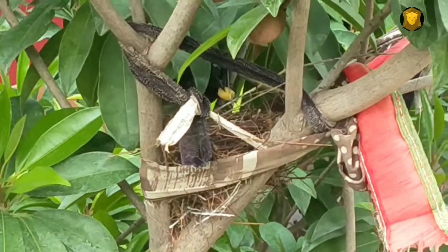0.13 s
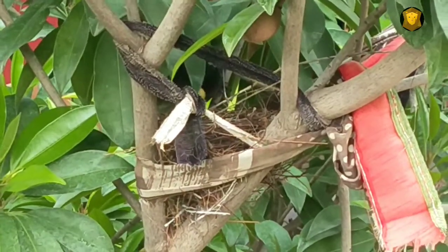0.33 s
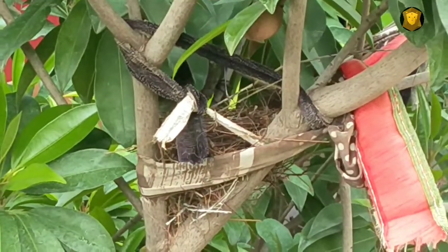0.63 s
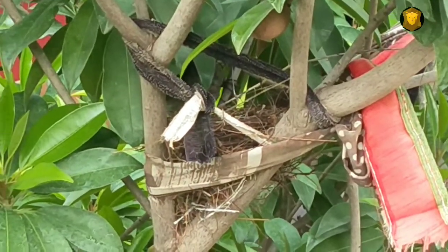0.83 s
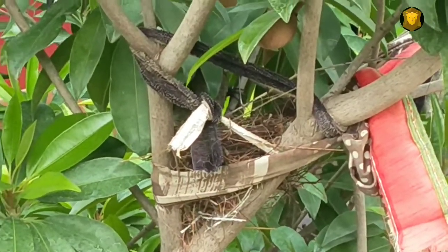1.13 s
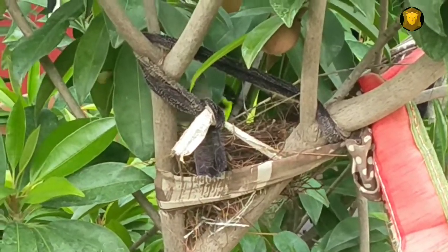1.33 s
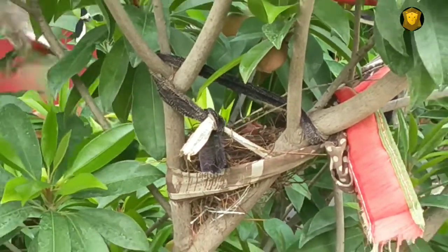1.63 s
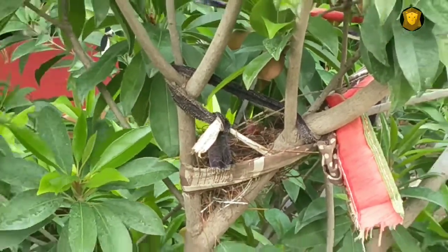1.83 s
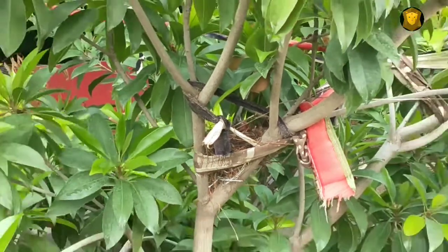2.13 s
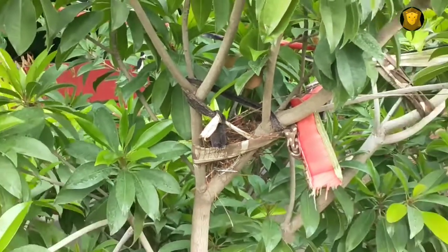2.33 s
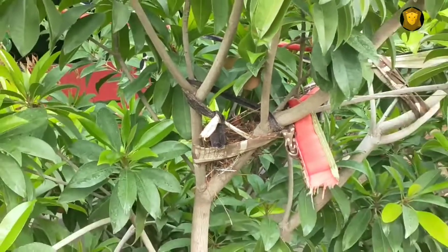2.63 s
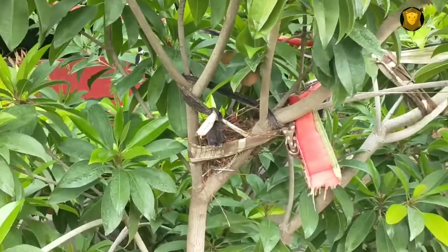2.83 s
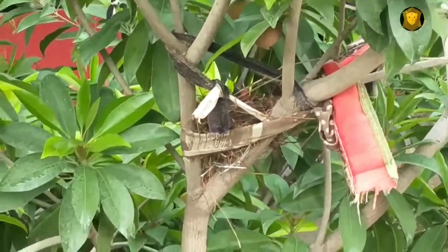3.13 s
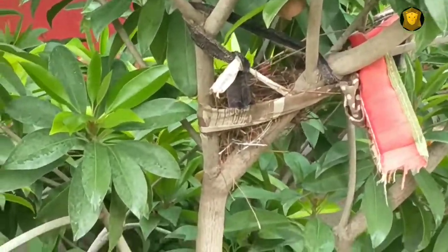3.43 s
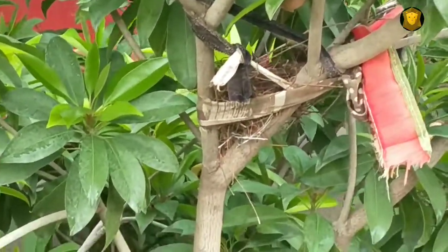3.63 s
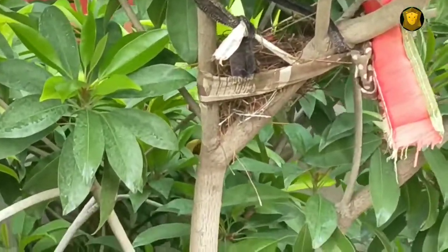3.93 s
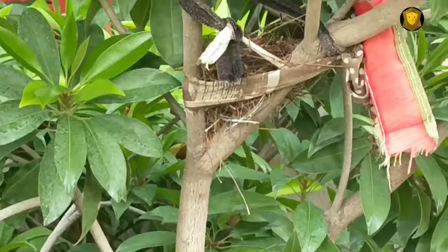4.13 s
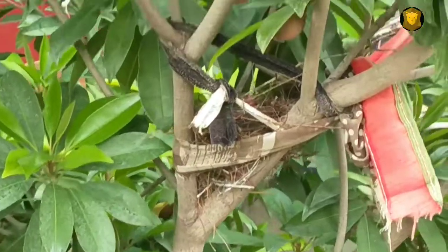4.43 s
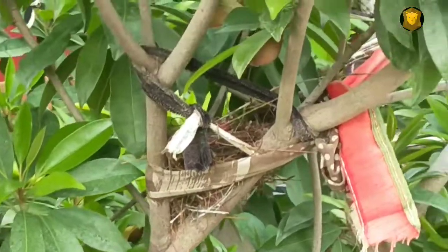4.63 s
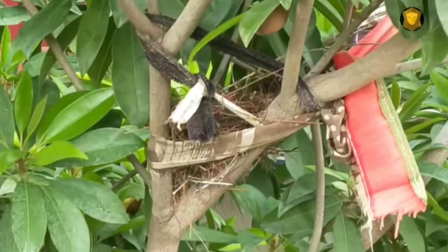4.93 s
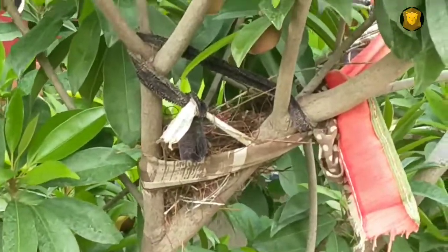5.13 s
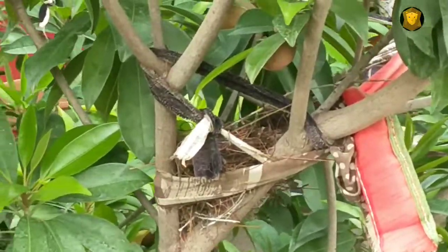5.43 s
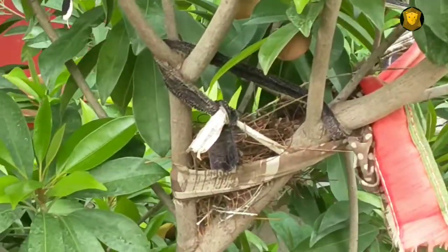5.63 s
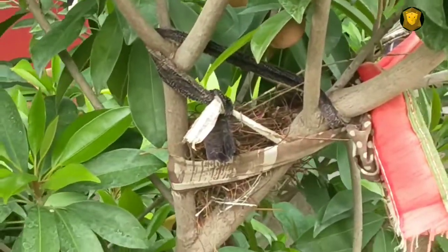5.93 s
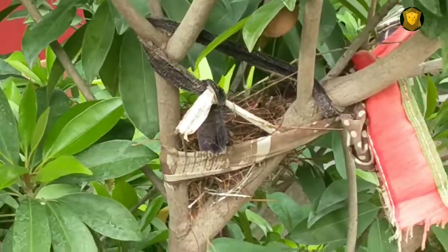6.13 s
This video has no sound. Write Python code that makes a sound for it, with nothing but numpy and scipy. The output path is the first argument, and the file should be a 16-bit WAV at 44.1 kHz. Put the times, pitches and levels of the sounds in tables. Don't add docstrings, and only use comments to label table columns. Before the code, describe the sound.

Several birds call close together among leaves, with a short scattered outdoor echo. Steady, mid-high double chirps lead and fade away before five seconds; a slow rattling croak opens underneath. Sharp upward flicks follow, then a loud run of rasping chatter near four seconds. After a brief lull, two harsh syllables, woody knocks and more flicks return. Wind puffs bump each side of the exposed microphone separately, over soft rustling.

```python
import sys
import numpy as np
from scipy import signal
from scipy.fft import rfft, irfft, next_fast_len
from scipy.io import wavfile
from scipy.ndimage import uniform_filter1d, map_coordinates

SR = 44100
rng = np.random.default_rng(int(sys.argv[2]) if len(sys.argv) > 2 else 0)


def digitize_waveform(pressure):
    field = np.atleast_2d(pressure).T
    bounded = np.clip(field, -1, 1)
    quanta = np.round(bounded * 32767).astype(np.int16)
    wavfile.write(sys.argv[1], SR, quanta)


def volts(x):
    e = np.asarray(x, float) / 20
    return 10 ** e


N = 276948


def unit(x):
    return x / np.sqrt(np.mean(x ** 2) + 1e-20)


def along(points, hz):
    f, v = np.transpose(points)
    return np.interp(np.log(hz + 1), np.log(f + 1), v)


def curves(rows):
    s, *cols = np.transpose(rows)
    return [np.interp(np.arange(N) / SR, s, c) for c in cols]


def wobble(rate, size=N):
    knots = rng.standard_normal(int(size * rate / SR) + 4)
    return map_coordinates(knots, [np.arange(size) * rate / SR])


def filtered(x, response):
    m = next_fast_len(x.shape[-1] + 8192)
    spectrum = rfft(x, m) * response(np.fft.rfftfreq(m, 1 / SR))
    return irfft(spectrum, m)[..., :x.shape[-1]]


def rush(spectrum, alike, patchy_db):
    z = signal.stft(rng.standard_normal((2, N)), nperseg=512)[2]
    field = uniform_filter1d(rng.standard_normal(z.shape[1:]), size=3, axis=0)
    field = uniform_filter1d(field, size=22, axis=1)
    pair = signal.istft(z * volts(patchy_db * unit(field)), nperseg=512)[1][:, :N]
    a, b = filtered(pair, lambda hz: volts(along(spectrum, hz)))
    turn = np.arccos(np.clip(alike, 0, 1)) / 2
    shared, apart = np.cos(turn) * a, np.sin(turn) * b
    return unit(np.array([shared + apart, shared - apart]))


def add(stage, sound, s, pan_db, lag):
    starts = (round(s * SR + lag), round(s * SR))
    for port, gain, start in zip(stage, volts([pan_db / 2, -pan_db / 2]), starts):
        port[start:start + len(sound)] += gain * sound[:len(port) - start]


def sing(shape, hz, overtones_db, flutter_db, flutter_hz=130, effort=0.2):
    s, ratio, db = np.transpose(shape)
    t = np.arange(s[0], s[-1], 1 / SR)
    phase = 2 * np.pi * np.cumsum(hz * np.interp(t, s, ratio)) / SR
    swell_db = np.interp(t, s, db)
    voice = np.zeros(len(t))
    for k, level in enumerate(overtones_db):
        flutter = flutter_db * (1 + k) * wobble(flutter_hz, size=len(t))
        voice += volts(level + (1 + effort * k) * swell_db + flutter) * np.sin((k + 1) * phase)
    return np.sqrt(2) * voice


def glide(length, start_hz, end_hz, fade_db, overtones_db):
    end = end_hz / start_hz
    shape = [(-.006, 1.03, -16), (0, 1, -1),
             (min(.3 * length, .013), .85 + .15 * end, 0),
             (.65 * length, .28 + .72 * end, fade_db / 2),
             (max(length - .004, .7 * length), end, fade_db),
             (length + .004, end, -28)]
    return sing(shape, start_hz, overtones_db, flutter_db=1.3, flutter_hz=260, effort=.8)


# start in seconds, wait to the second note in seconds,
# length of the second note in seconds, pitch in Hz, level in dB.
CALLS = [(-.078, .082, 0.028, 2296, -56), (0.214, 0.087, 0.047, 2365, -52),
         (0.514, 0.08, 0.048, 2367, -48.5), (.812, 0.084, 0.034, 2343, -50),
         (1.112, 0.082, 0.054, 2368, -55), (1.419, 0.078, .048, 2354, -53.5),
         (1.724, 0.075, 0.05, 2332, -54.5), (2.027, 0.076, 0.041, 2342, -52.5),
         (2.335, 0.077, 0.061, 2345, -55.5), (2.648, .08, 0.086, 2250, -61),
         (2.975, .073, 0.079, 2196, -60.5), (3.303, 0.07, 0.052, 2200, -59),
         (3.631, 0.058, .06, 2243, -63.5), (3.992, 0.078, 0.032, 2140, -63.5),
         (4.335, .076, 0.077, 2170, -64), (4.736, .073, .073, 2140, -62)]
# time in seconds, left over right in dB.
CALLER_PAN = [(0, 4.5), (2.1, 3.5), (2.9, 0), (3.8, 6.5), (5, -2)]
# time in seconds, level in dB.
CALLER_OVERTONE = [(0, -11), (.2, -21), (.6, -17.5), (1.3, -18), (1.75, -20), (2, -28), (5, -28)]


def caller():
    pause_s, lift, second_note_db = 0.038, 1.02, 0.8
    first_sag, second_sag, lowest_hz = 3300, 9300, 1710
    fuzz_depth, fuzz_hz = .13, 1200
    grace_shape = [(0, .88, -14), (.016, 1.04, -5), (.023, 1.15, 0), (.029, 1.06, -8)]
    catch_shape = [(0, 1.05, -10), (.006, 1.17, 0), (.014, 1.05, -8)]
    stage = np.zeros((2, N))
    for s, wait, length, hz, db in CALLS:
        pan_db = np.interp(s, *np.transpose(CALLER_PAN))
        overtone_db = np.interp(s, *np.transpose(CALLER_OVERTONE))
        if s > 0:
            grace = sing(grace_shape, hz, [0, -24], flutter_db=3, flutter_hz=800)
            add(stage, volts(db - 7) * grace, s - .029, pan_db, lag=13.6)
            first_s = wait - pause_s
            first = glide(first_s, .985 * hz, hz - first_sag * first_s, -6.5, [0, overtone_db])
            add(stage, volts(db - 1.5) * first, s - .004, pan_db, lag=19)
        top_hz = lift * hz
        end_hz = max(top_hz - second_sag * length, lowest_hz)
        second = glide(length, .985 * top_hz, end_hz, -10, [0, overtone_db - 3])
        catch = sing(catch_shape, hz, [0], flutter_db=2.5, flutter_hz=900)
        add(stage, volts(db - 11) * catch, max(s + wait - .006, 0), pan_db, lag=14)
        add(stage, volts(db - 1.5 + second_note_db) * second, s + wait, pan_db, lag=19)
    return stage * (1 + fuzz_depth * wobble(fuzz_hz))


# time in seconds, arch top in Hz, arch level in dB,
# wait to the flick in seconds, flick level in dB.
PHRASES = [
    (1.8, 3510, -62, .12, -49),
    (2.14, 3485, -55.5, .12, -49),
    (2.465, 3486, -58, 0.13, -48.5),
    (2.805, 3560, -60.5, 0.12, -51.5),
    (5.283, 3450, -59, .129, -50),
    (5.631, 3435, -61, .13, -53.5),
    (5.981, 3440, -66, 0.12, -56.5),
]
# time in seconds, pitch ratio, level in dB.
ARCH_SHAPE = [(-.036, .62, -22), (-.018, .79, -7), (-.007, .95, -2), (0, 1, 0), (.007, .95, -2),
              (.018, .81, -5), (.036, .74, -18)]
FLICK_SHAPE = [(-.04, .7, -32), (-.026, .715, -16), (-.016, .77, -3), (-.006, .93, 0), (-.001, 1, -3),
               (.003, .97, -9), (.008, .92, -24)]
# start in seconds, length in seconds, start pitch in Hz, end pitch in Hz, level in dB.
WHISTLES_LEFT = [(1.345, 0.11, 4050, 4380, -76), (1.409, 0.031, 5580, 4960, -72),
                 (1.705, 0.018, 5520, 5150, -74), (4.071, 0.079, 2307, 2365, -64.5),
                 (4.115, 0.008, 5930, 5540, -57), (4.198, 0.055, 2296, 2400, -72.5),
                 (4.386, .041, 2330, 2495, -70.5), (4.419, 0.048, 2470, 2468, -68.5),
                 (6.047, .09, 2650, 2550, -77.5)]
WHISTLES_RIGHT = [(.165, .03, 4880, 5230, -72), (.197, .04, 5250, 4980, -69), (.195, .03, 6650, 6550, -74),
                  (.455, .04, 6050, 6000, -80), (4.083, 0.032, 5330, 5970, -57),
                  (5.176, 0.017, 1480, 1600, -66.5), (5.668, 0.073, 2590, 2480, -75.5),
                  (5.688, .06, 1880, 1776, -73.5), (5.728, 0.025, 2440, 2240, -70)]


def singers():
    stage = np.zeros((2, N))
    for s, hz, db, wait, flick_db in PHRASES:
        arch = sing(ARCH_SHAPE, hz, [0], flutter_db=2.2, flutter_hz=320)
        add(stage, volts(db) * arch, s + ARCH_SHAPE[0][0], -2, lag=14)
        flick = sing(FLICK_SHAPE, 5248, [0], flutter_db=2.2, flutter_hz=320)
        add(stage, volts(flick_db) * flick, s + wait + FLICK_SHAPE[0][0], 5, lag=14)
    for rows, pan_db in ((WHISTLES_LEFT, 13), (WHISTLES_RIGHT, -6)):
        for s, length, start_hz, end_hz, db in rows:
            whistle = glide(length, start_hz, end_hz, -2, [0])
            add(stage, volts(db) * whistle, s, pan_db, lag=3)
    return stage


# time in seconds, peak level in dB, effort from 0 to 1.
CHATTER = [(1.962, -47.5, .7), (2.049, -42.5, 0.89), (3.651, -42.5, .3), (3.703, -40.5, 0.71),
           (3.769, -38, 0.88), (3.85, -38, 0.87), (3.955, -36.5, 0.91), (4.044, -35, 1), (4.134, -36, 0.97),
           (5.132, -47.5, 0.34), (5.191, -43.5, 0.27), (5.254, -40, 0.88), (5.36, -39.5, 0.82)]
# time in seconds, pitch ratio, level in dB.
SYLLABLE = [(-.007, .82, -16), (0, .88, -4), (.008, 1.02, 0), (.014, 1.2, -5), (.021, 1.15, -8),
            (.032, .97, -22)]
CHATTER_HARMONICS = [0, -.5, -1.5, -9, -9, -15]
# frequency in Hz, level in dB.
THROAT = [(550, -54), (800, -7.5), (1050, -5), (1500, -6.5), (2000, -7), (3200, -1.5), (4100, -2.5),
          (5300, -6), (7000, -11)]


def chatter():
    breath_at_s, breath_s, grain_db = .026, .013, 2.8
    weak_tilt_db = 4
    stage = np.zeros((2, N))
    for s, db, effort in CHATTER:
        shape = [(t, 1 + effort * (ratio - 1), swell_db) for t, ratio, swell_db in SYLLABLE]
        tilt_db = weak_tilt_db * (1 - effort) * np.arange(len(CHATTER_HARMONICS))
        stack = sing(shape, 1000, CHATTER_HARMONICS - tilt_db, flutter_db=1.6, flutter_hz=400, effort=.2)
        t = np.arange(len(stack)) / SR
        breath = np.exp(-((t - breath_at_s) / breath_s) ** 2) * rng.standard_normal(len(t))
        breath = breath * volts(grain_db * wobble(350, size=len(t)))
        broken = volts(3 * (1.1 - effort) * wobble(220, size=len(t)))
        syllable = broken * (stack + (1.3 + 1.9 * effort) * breath)
        add(stage, volts(db - 13.5) * syllable, s + SYLLABLE[0][0], -.4, lag=2)
    return filtered(stage, lambda hz: volts(along(THROAT, hz)))


# time in seconds, pulses a second, level in dB.
CROAKS = [
    [(0, 101, -53), (.15, 95, -47.5), (.33, 86, -45), (.4, 68, -46.5), (.49, 70, -46.5), (.51, 49, -102)],
    [(5.98, 66, -56), (6.05, 70, -57.5), (6.15, 72, -46.5), (6.25, 130, -63), (6.28, 51, -74)],
]
# center in Hz, width in Hz, level in dB.
CROAK_THROATS = [
    [(1240, 810, -7), (1780, 106, 9), (2100, 440, 1)],
    [(1080, 620, -8.5), (1760, 55, 13), (2740, 400, 1)],
]


def croaks():
    voice = np.zeros(N)
    for rows, modes in zip(CROAKS, CROAK_THROATS):
        rate, db = curves(rows)
        cycles = np.cumsum(rate * (1 + .04 * wobble(40))) / SR
        at = np.flatnonzero(np.diff(np.floor(cycles)))
        at = at[(at >= rows[0][0] * SR) & (at < rows[-1][0] * SR)]
        pulses = np.zeros(N)
        pulses[at] = volts(db[at] + 28 + 2.5 * wobble(90)[at])

        def throat(f):
            ring = 0
            for k, (center, width, gain_db) in enumerate(modes):
                band = 1j * f * width / (center * center - f * f + 1j * f * width)
                ring = ring + (-1) ** k * volts(gain_db) * band
            surface = 1 + 0.57 * np.exp(-2j * np.pi * f * 0.00417)
            return ring / (1 + (f / 2700) ** 8) * surface

        voice = voice + filtered(pulses, throat)
    return np.array([voice * volts(-5.0), np.roll(voice, -8) * volts(-8.0)])


# time in seconds, peak level in dB, center in Hz, fall by 60 dB in seconds.
TICKS = [
    (1.247, -50.5, 4520, 0.023),
    (1.453, -53, 5480, 0.0055),
    (1.514, -54.5, 4450, 0.036),
    (3.749, -47, 5000, 0.00604),
    (4.305, -46, 6000, .006),
    (5.41, -52, 2600, .008),
    (5.444, -41, 2710, 0.014),
    (5.509, -36, 2654, 0.012),
    (5.553, -50.5, 5170, 0.0068),
    (5.598, -56.5, 5480, 0.069),
]
SCRATCHES = [
    (4.5037, -61, 5380, 0.04),
    (4.6049, -58, 5040, 0.04),
    (4.6349, -60, 4920, 0.04),
    (4.7094, -62, 5310, 0.04),
    (4.8928, -69, 6230, 0.04),
    (4.9187, -66, 6390, 0.04),
]


def twigs():
    stage, t = np.zeros((2, N)), np.arange(1500) / SR
    for s, db, hz, t60 in TICKS + SCRATCHES:
        grit = uniform_filter1d(rng.standard_normal(len(t)), size=20) * np.sqrt(20)
        scratch = 25 * t60 * grit * volts(-60 * t / t60) * (t > .001)
        ring = volts(-60 * t / 0.0072) + scratch
        onset = 1 - np.exp(-t / 0.00029)
        add(stage, volts(db + 2.5) * np.sin(2 * np.pi * hz * t) * ring * onset, s, -1.5, lag=1.8)
    return stage


# frequency in Hz, level in dB per Hz.
WIND_TONE = [(12, -45), (20, -20), (59, 1.5), (108, 2.5), (189, -8), (375, -28), (604, -40), (687, -32),
             (900, -50), (1170, -55.5), (1980, -120)]
# time in seconds, level in dB, length in seconds.
EDDIES_LEFT = [(0.078, -32.5, 0.036), (0.236, -39, 0.051), (0.485, -37, 0.089), (0.569, -35, 0.057),
               (0.74, -41.5, 0.04), (0.867, -39.5, 0.037), (1.176, -41, 0.18), (2.071, -47, 0.074),
               (2.189, -42, 0.16), (4.26, -44.5, 0.041), (4.322, -40, 0.021), (4.437, -39, 0.099),
               (4.579, -40.5, 0.015), (4.823, -39, 0.11), (5.179, -41.5, 0.039), (5.242, -39, 0.054),
               (5.664, -42.5, 0.013), (5.819, -46, 0.044), (5.946, -40.5, 0.053), (6.016, -45, 0.086)]
EDDIES_RIGHT = [(0.014, -42.5, 0.16), (0.186, -41.5, 0.025), (0.488, -46.5, 0.062), (0.642, -35.5, 0.038),
                (0.833, -44.5, 0.053), (1.051, -43.5, 0.06), (1.26, -41.5, 0.056), (1.598, -42.5, 0.022),
                (1.658, -35, 0.022), (1.809, -37.5, 0.015), (2.156, -38.5, 0.062), (2.512, -39.5, 0.049),
                (3.229, -37.5, 0.038), (3.352, -42.5, 0.15), (3.526, -39.5, 0.061), (3.64, -42, 0.065),
                (3.747, -37.5, 0.12), (3.959, -32, 0.077), (4.038, -39, 0.035), (4.099, -38, 0.021),
                (5.136, -43, 0.064), (5.759, -43, 0.03), (6.188, -42, 0.022), (6.257, -41, 0.025)]
# time in seconds, level in dB.
LULL_LEFT = [(0, -44), (0.7, -53.5), (2.1, -56.5), (2.8, -63.5), (3.9, -63.5), (4.3, -54.5), (5.2, -53),
             (5.6, -59)]
LULL_RIGHT = [(0, -55), (1.4, -53.5), (2.8, -61), (3.3, -50.5), (4.1, -50), (4.3, -54), (5, -55),
              (5.6, -57)]
# time in seconds, peak pressure (full scale 1), frequency in Hz.
SLAPS = [
    (3.932, .09, 130),
    (3.961, .185, 175),
    (3.9605, .017, 450),
    (3.97, .06, 140),
    (3.979, .06, 140),
    (4.024, .03, 130),
    (4.039, .055, 130),
]


def wind():
    t, stage = np.arange(N) / SR, np.zeros((2, N))
    low = rush(WIND_TONE, 0.2, patchy_db=1.95)
    low = low / np.sqrt(uniform_filter1d(low ** 2, 1500) + .15)
    for port, lull, eddies in ((0, LULL_LEFT, EDDIES_LEFT), (1, LULL_RIGHT, EDDIES_RIGHT)):
        power = volts(1.935 * (curves(lull)[0] + 0.5 + 1.8 * wobble(11)))
        for s, db, length in eddies:
            near = slice(max(round((s - length) * SR), 0), round((s + length) * SR))
            power[near] += volts(2 * db + 5.0) * np.exp(-((t[near] - s) / (0.32 * length)) ** 2)
        stage[port] = np.sqrt(power) * low[port]
    stage = stage + 0.98 * filtered(stage ** 2, lambda hz: hz > 120)
    stage = filtered(stage, lambda hz: 1 / np.sqrt(1 + (42 / (hz + 1)) ** 4))
    for s, peak, hz in SLAPS:
        u = np.pi * hz * (np.arange(800) - 400) / SR
        push = peak * (1 - 2 * u ** 2) * np.exp(-u ** 2)
        stage[1, round(s * SR) - 400:][:800] += push
    return stage


# start in seconds, time to fade 20 dB in seconds, level in dB, left over right in dB.
BRUSHES = [(3.575, .07, -75.5, -12), (3.61, .1, -82, -4), (4.145, .06, -94, -1), (4.29, .12, -90, 0),
           (4.495, .1, -86, 2), (4.56, .15, -89, 0), (4.63, .1, -88, 0), (4.7, .09, -84, -1),
           (4.94, .05, -94, 2), (5.235, .16, -86, -4), (5.33, .16, -84, -6), (5.596, .09, -80, -4),
           (5.815, .05, -91, -4), (6.03, .15, -83, -6), (6.1, .1, -86, -3), (6.15, .15, -80, -2),
           (6.26, .08, -83, -4)]
# time in seconds, level in dB.
FAR_LEVEL = [(0, -74.5), (.48, -70.5), (.62, -77), (2.06, -70.5), (3, -79), (3.35, -75), (3.9, -71),
             (4.9, -77), (5.08, -83), (5.3, -71), (5.86, -73), (6.28, -69.5)]
BREEZE_LEVEL = [(0, -91), (1.3, -91.5), (1.5, -76.5), (3.15, -87.5), (3.3, -77.5), (4.75, -76), (5.05, -90),
                (5.14, -88), (5.4, -79), (6.28, -81)]
# frequency in Hz, level in dB per Hz.
HUM_TONE = [(180, -32), (300, -3), (449, -9), (671, -11.5), (880, -26.5), (1100, -36.5), (1430, -57),
            (2420, -120)]
MURMUR_TONE = [(530, -57), (900, -17.5), (1710, -9), (2230, -5), (2430, -4), (3080, -12.5), (3290, -15),
               (3990, -16), (4200, -28), (5460, -57), (9240, -120)]
LEAF_TONE = [(2240, -63), (3800, -9.5), (4400, -6), (4920, -3.5), (5210, -1), (7540, -17.5), (8460, -23),
             (9410, -23), (11000, -25), (14300, -31.5), (22000, -120)]
BRUSH_TONE = [(4120, -28), (7000, -11), (9000, -14), (11500, -10), (13000, -11), (13800, -3), (15500, -1)]
TRAFFIC_TONE = [(15, -30), (25, -2), (45, 0), (70, -4), (120, -40), (200, -120)]


def garden():
    t, brushing = np.arange(SR // 3) / SR, np.zeros((2, N))
    for s, fade, db, pan_db in BRUSHES:
        stroke = np.clip(t / 0.012, 0, 1) * volts(db - 20 * t / fade)
        add(brushing, stroke, s, pan_db, lag=0)
    brushing = volts(2 * wobble(45)) * brushing
    hum = volts(-72.0 + 1.2 * wobble(4)) * rush(HUM_TONE, 0.43, patchy_db=3.5)
    murmur = volts(curves(FAR_LEVEL)[0] - 1.0) * rush(MURMUR_TONE, .25, patchy_db=5.5)
    leaf_level = volts(curves(BREEZE_LEVEL)[0]) + volts(7) * brushing
    rustle = leaf_level * volts(2.5 + 1.8 * wobble(150)) * rush(LEAF_TONE, .15, patchy_db=3.5)
    hiss = brushing * volts(8.5 + 2.8 * wobble(160)) * rush(BRUSH_TONE, 0.23, patchy_db=3)
    traffic = unit(filtered(rng.standard_normal((2, N)), lambda hz: volts(along(TRAFFIC_TONE, hz))))
    return hum + murmur + rustle + hiss + volts(-65) * traffic


# frequency in Hz, fall by 60 dB in seconds.
YARD_DECAY = [(800, 0.25), (2300, 0.27), (5200, 0.33), (9000, 0.075)]


def yard(x):
    wet, step = np.zeros((2, N + SR)), SR // 3
    for start in range(0, N, step):
        hz, t, z = signal.stft(rng.standard_normal((2, SR // 2)), SR, nperseg=256)
        decay = volts(-60 * t / along(YARD_DECAY, hz)[:, None])
        tail = signal.istft(z * decay, SR, nperseg=256)[1]
        tail = tail / np.linalg.norm(tail[0])
        echo = signal.fftconvolve(x[None, start:start + step], tail, axes=1)
        wet[:, start:start + echo.shape[1]] += echo[:, :N + SR - start]
    return np.pad(wet, ((0, 0), (200, 0)))[:, :N]


# frequency in Hz, level in dB.
PORT_TONE = [(800, 0), (2400, 0), (3500, -4), (4100, -7), (4500, -5), (5300, 0), (6200, -10), (8000, -30)]


def scene():
    near, snaps, far, hoarse, croak = caller(), twigs(), singers(), chatter(), croaks()
    send = volts(-6.5) * near + volts(-12) * snaps + volts(-2) * far + volts(-4.5) * hoarse + volts(-2.5) * croak
    birds = near + snaps + far + hoarse + croak + yard(send.mean(axis=0))
    return filtered(birds, lambda hz: volts(along(PORT_TONE, hz))) + wind() + garden()


def roll_off(x):
    return signal.sosfilt(signal.butter(12, 15640, fs=SR, output="sos"), x)


def record(dry):
    def microphone(hz):
        dip = 1 - 0.48 * np.exp(-((hz - 3975) / 252) ** 2)
        return dip / np.sqrt(1 + (28 / (hz + 1)) ** 4)

    mic = filtered(dry, microphone)
    mic = mic * np.clip(.2 + np.arange(N) / (.004 * SR), 0, 1)
    mix = mic + volts(-106) * rng.standard_normal(dry.shape)
    return roll_off(mix)


dry = scene()
out = record(dry)
digitize_waveform(out)
```